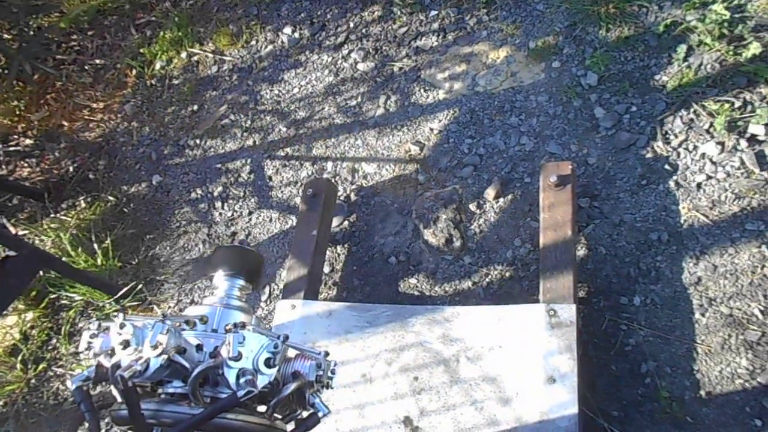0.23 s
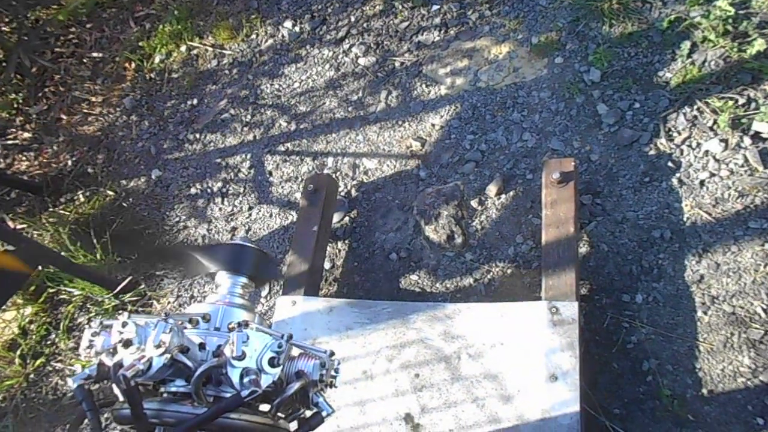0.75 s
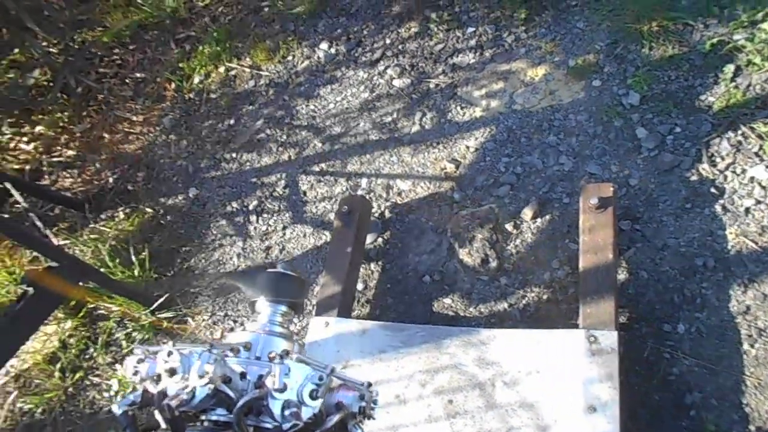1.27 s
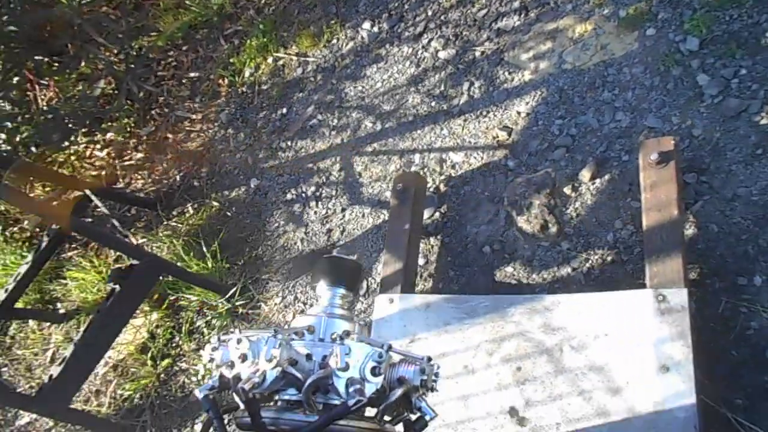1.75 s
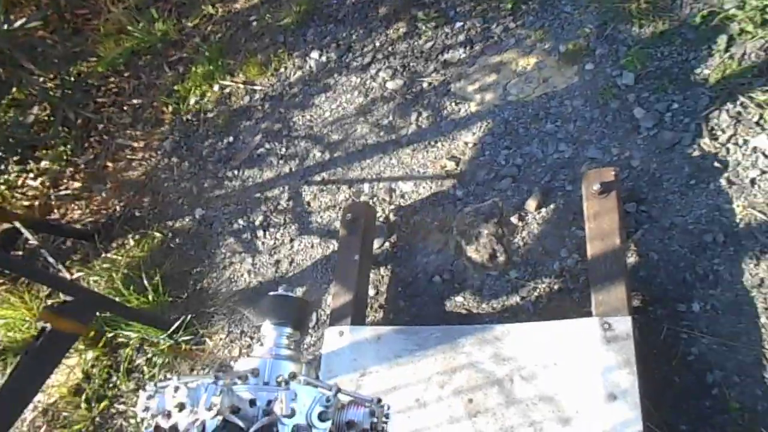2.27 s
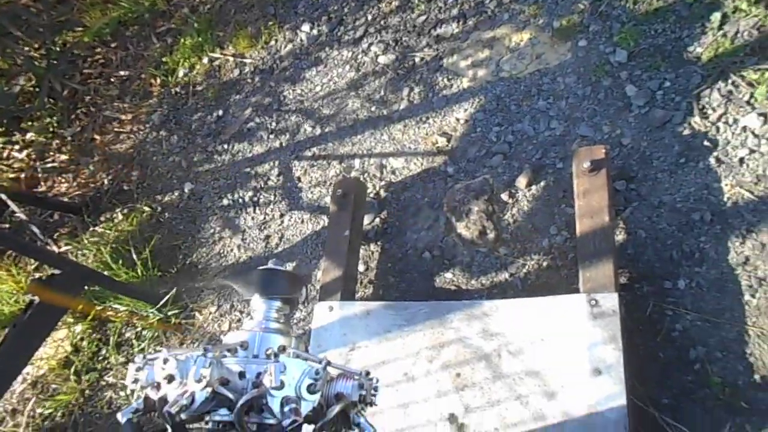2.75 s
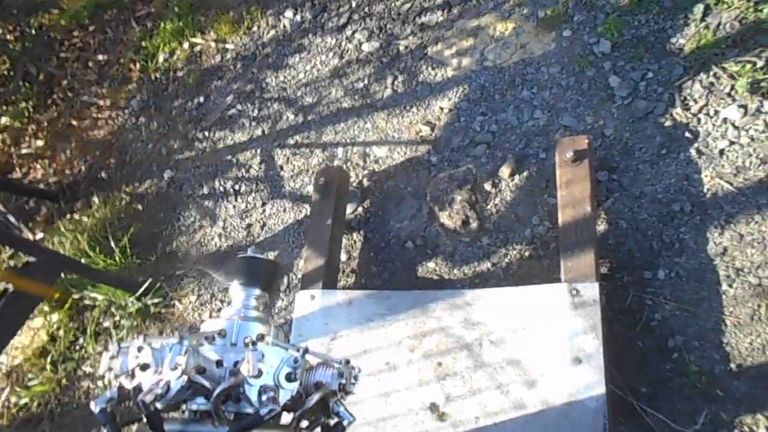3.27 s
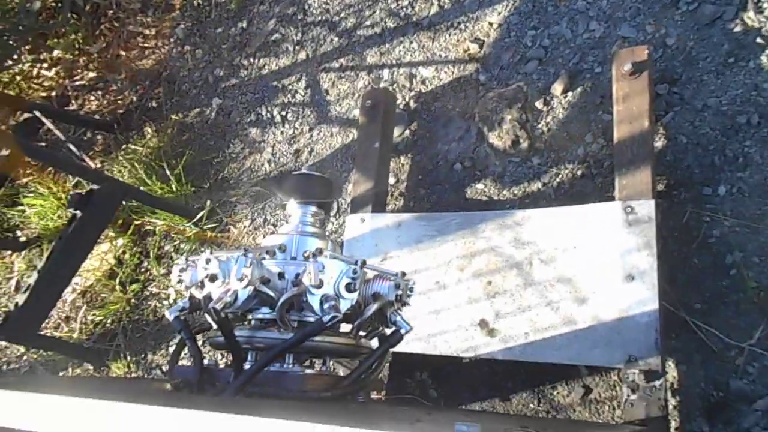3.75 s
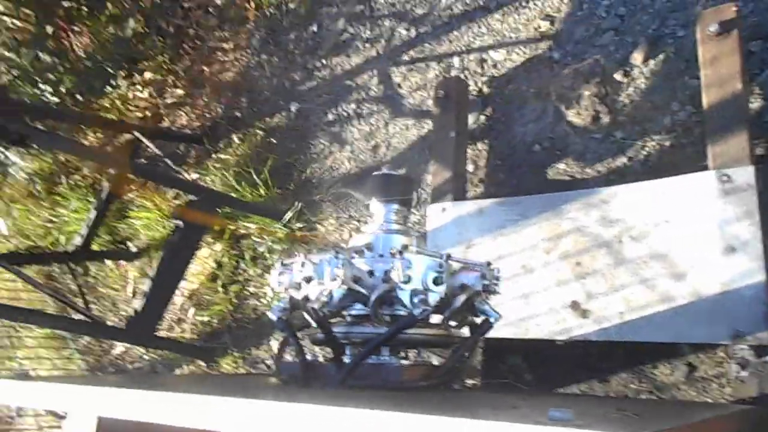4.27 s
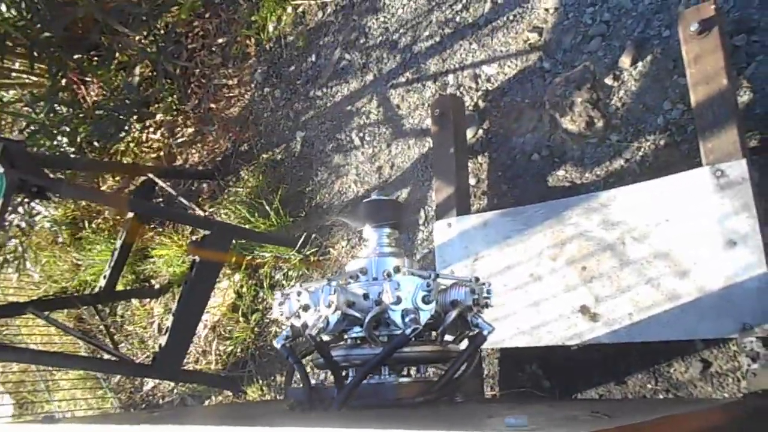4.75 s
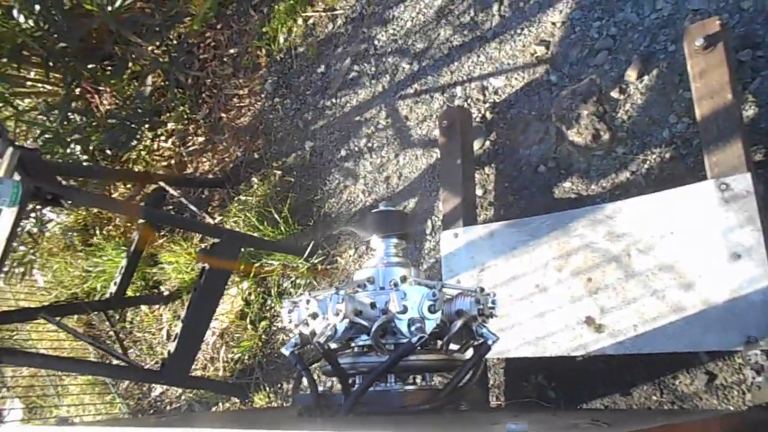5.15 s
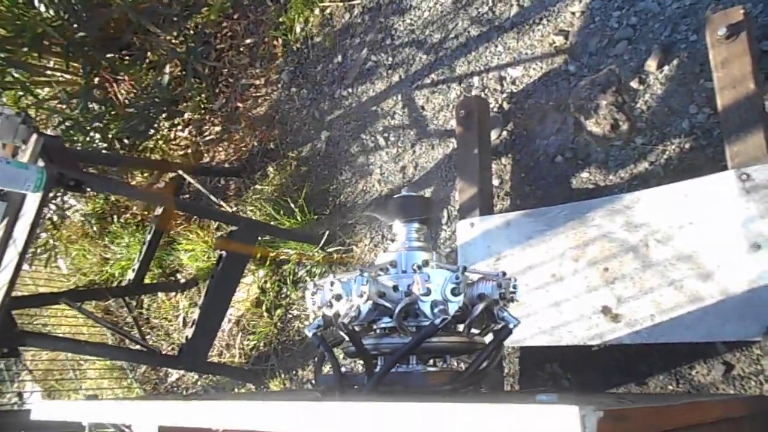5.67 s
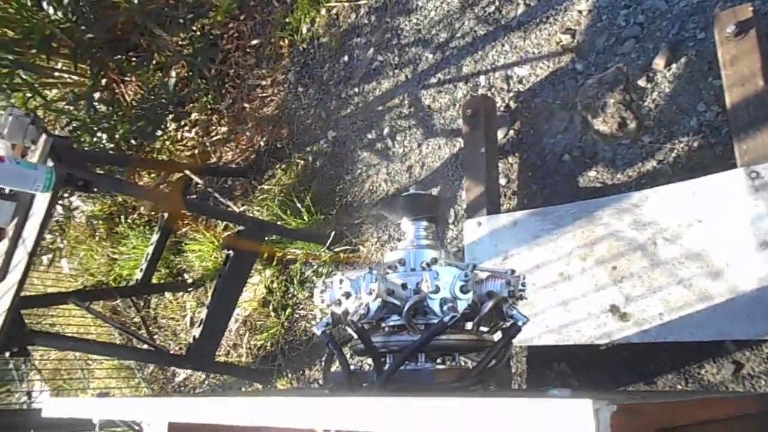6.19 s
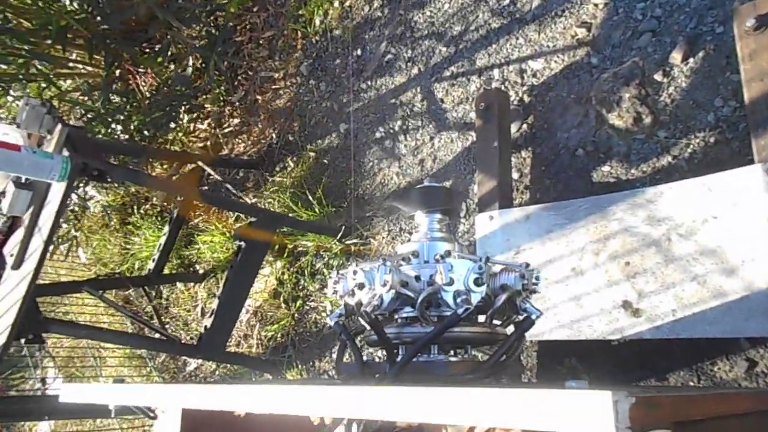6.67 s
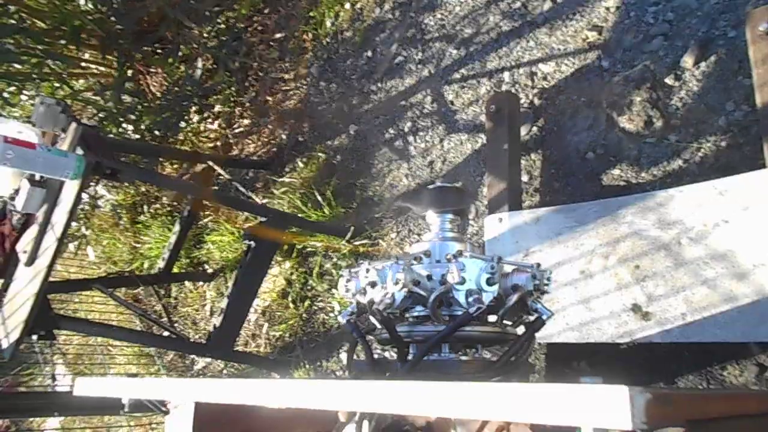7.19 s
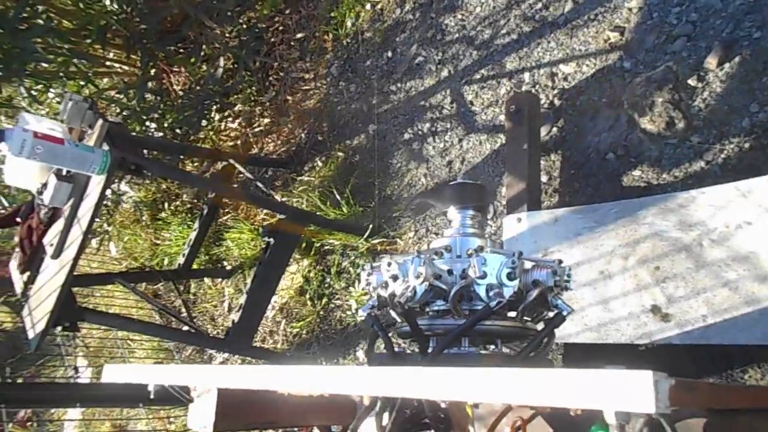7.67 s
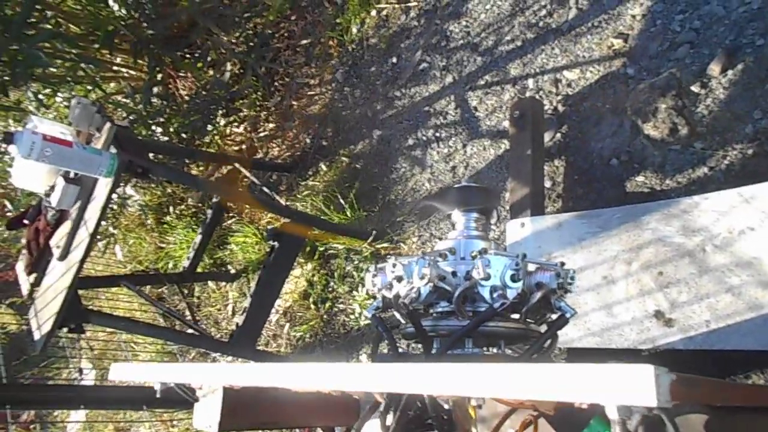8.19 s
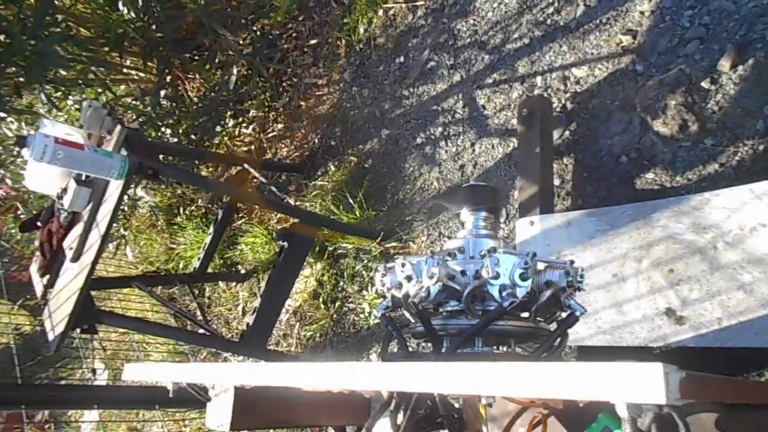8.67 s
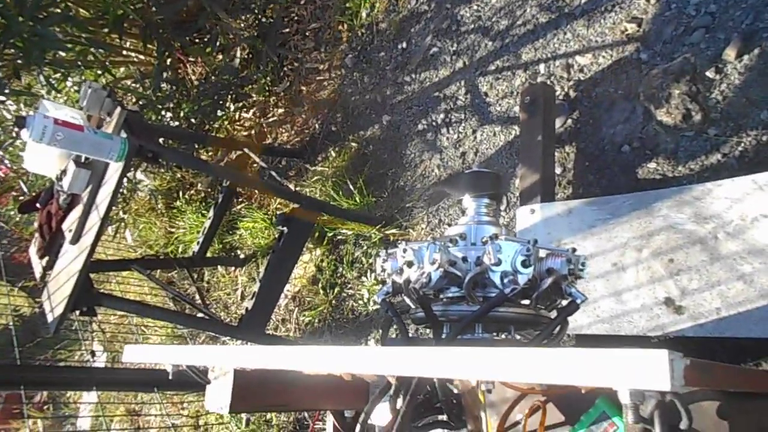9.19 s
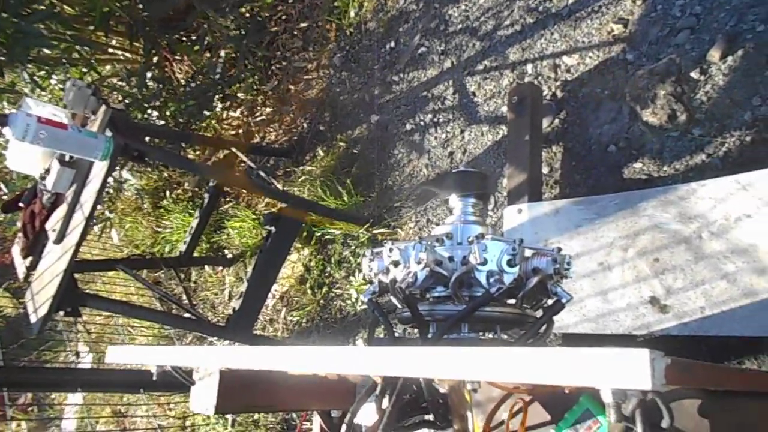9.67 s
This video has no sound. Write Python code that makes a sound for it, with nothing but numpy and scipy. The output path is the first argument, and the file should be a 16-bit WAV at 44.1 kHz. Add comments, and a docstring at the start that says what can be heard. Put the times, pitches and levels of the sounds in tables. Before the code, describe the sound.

A small radial engine with a two-blade propeller stumbles on an outdoor bench: quiet puffs of air, a few loud metallic exhaust snaps, a brief near-lull, then rattling running with frequent cracks. It speeds up steadily after the middle, and propeller wind slams the close microphone, turning everything into dense, crackling, overloaded buffeting with tiny dropouts.

```python
"""A small two-row radial engine stumbles, catches and speeds up on an outdoor bench.
Its fourteen cylinders kick rattling noise and a hum out of the metal; an open exhaust stub snaps with short blasts.
The two-blade propeller blows at the microphone: noise sweeps past its opening (the port) faster as the air speeds up.
Bursts, sharp spikes, flashes of treble and a low rumble come with that wind.
Strong pushes hold the capsule, the part that senses the sound, so that the rest drops out for moments."""
import sys
import numpy as np
from scipy import signal
from scipy.fft import rfft, irfft, next_fast_len
from scipy.io import wavfile
from scipy.ndimage import uniform_filter1d

SR = 44100
rng = np.random.default_rng(int(sys.argv[2]) if len(sys.argv) > 2 else 0)


def pcm_store(signal):
    """Save signal as 16-bit PCM."""
    levels = np.round(np.clip(np.atleast_2d(signal), -1, 1) * 32767)
    wavfile.write(sys.argv[1], SR, levels.astype(np.int16).T)


N = 438354

# --- tables
# speed of the crankshaft: start_s, four_stroke_cycles_per_s
ENGINE_SPEED = [(0, 12.5), (1, 13), (1.6, 10), (2.2, 13.7), (2.6, 14.4), (3.3, 14.5), (3.9, 14.9),
                (4.45, 17), (5, 17.4), (5.5, 18.6), (5.8, 20.5), (6.5, 25.5), (7.5, 30.6), (7.8, 32.7),
                (8, 33.7), (8.5, 34), (8.9, 35.4), (9.94, 36.4)]
# strength of each firing in one cycle, the far row weaker: level_db
CYLINDER_DB = [-1, -18, -2.5, -14.5, 0.5, -2.5, 3.5, -23, -6, -1, -12, -17, -1.5, -2.5]
# tone colour of the rattle: pitch_hz, relative_level_db (per Hz)
CLATTER_COLOUR = [(150, -26), (250, 7), (616, 1.5), (1690, -7.5), (2140, -11), (2420, -18), (2880, -15.5),
                  (6160, -15.5), (8820, -24), (10300, 6.5), (13400, -63), (22000, -120)]
# tones at which case and bench ring: pitch_hz, width_hz, relative_level_db
CASE_TONES = [(1980, 320, -9.5), (2560, 520, -2.5), (3390, 1570, -2), (4600, 270, -12), (5480, 390, -10.5),
              (6640, 330, -22)]
# how the ringing changes over time: start_s, lower_tones_db, upper_tones_db, pitch_factor (all ring tones shift
# together by this factor)
RINGING = [(0, -3.5, 2, 1.03), (0.9, -5.5, -3.5, 1.06), (1.2, 0, -12, 0.84), (1.6, -2.5, -3, 1.03),
           (1.9, -8.5, -5, 0.98), (2.4, -5, -1.5, 1.01), (3.5, -8.5, -4.5, 1.065), (4.5, -4, -6.5, 1.026),
           (5.6, -8, -14.5, 1.066), (9.94, -9, -16, 1.072)]
# exhaust cracks: start_s, level_db, treble_db (tilt of the stub's upper tones), strongest_ring_hz
CRACKS = [(0.4863, -30, -5, 3520), (0.785, -25.5, -1, 4960), (1.076, -12, -14, 3890),
          (1.4143, -18, -28, 2900), (1.481, -35, -28, 2600), (1.6603, -41, -1, 3873),
          (1.793, -26, -8, 2789), (2.1338, -12, -24, 3766), (2.1822, -29, 5, 3480), (2.2451, -31, 0, 4786),
          (2.2621, -15.5, -9, 3650), (2.5301, -34, -3, 2821), (2.67, -22, -9.5, 3640),
          (2.9487, -20, -11, 3630), (3.1008, -33, 5, 3065), (3.342, -23, -15.5, 3833),
          (3.496, -26.5, -13, 2770), (3.634, -22, -15.5, 3695), (3.8361, -20, -11, 3740),
          (4.039, -19, -19, 3795), (4.085, -32, 5, 2679), (4.1519, -21, -8, 4980), (4.1677, -31, 4, 4900),
          (4.289, -12, -13, 3900), (4.346, -31, -24, 2655), (4.5227, -13.5, -17, 4417),
          (4.8169, -22, -12, 3674), (4.8733, -23, -10, 2753), (4.9335, -22.5, -17, 2747),
          (4.9904, -17, -10, 3716), (5.1056, -20, -21.5, 3725), (5.161, -30, -13, 4134),
          (5.215, -21, -27, 4250), (5.2713, -17, -23, 4245), (5.436, -17, -14, 4206),
          (5.4881, -17, -13, 4417), (5.676, -24, -10, 3564), (5.803, -28, -24, 3760)]
# tones of the exhaust stub: pitch_hz, width_hz, relative_level_db
STUB_TONES = [(2700, 760, 4), (4352, 2200, 6.5), (6043, 3500, 8.5), (7661, 2200, 11)]
# course of engine and air: start_s, clatter_db, wash_db
FLOW = [(0, -47.5, -47), (0.36, -46, -40), (0.65, -47.5, -48), (0.9, -40, -47), (1.13, -29, -39),
        (1.33, -45.5, -39), (1.55, -61.5, -52), (1.74, -47.5, -54), (1.82, -35.5, -50), (1.99, -27, -41),
        (2.12, -36, -39), (2.4, -43.5, -45), (2.88, -42, -45), (3.18, -36.5, -41), (4.12, -37.5, -41),
        (4.4, -42.5, -40), (4.95, -39, -40), (5.3, -39.5, -47), (5.65, -32.5, -38), (5.84, -41, -30),
        (6.3, -40.5, -32), (6.6, -42.5, -27), (6.95, -35.5, -23), (7.3, -39, -24), (7.6, -37.5, -28),
        (7.83, -30.5, -21), (8.9, -30, -23.5), (9.14, -28, -20), (9.94, -31.5, -22.5)]
# strongest eddies that burst on the port: middle_s, level_db, width_ms
BURSTS = [(0.079, -34, 8.7), (0.153, -33, 6.7), (0.179, -33, 12.8), (0.21, -36, 22.4), (0.252, -31, 8.1),
          (0.302, -30, 9.8), (0.349, -28, 7.933), (0.383, -32, 12.03), (0.422, -36, 8.9), (0.451, -33, 7.9),
          (0.503, -25, 6.1), (0.54, -33, 6.4), (0.571, -33, 6.2), (0.61, -33, 8.1), (0.625, -35, 7.7),
          (0.759, -33, 10.2), (0.825, -28, 7.26), (1.032, -25, 7.4), (1.04, -22, 10.9), (1.091, -24, 7.6),
          (1.13, -21, 7.9), (1.1368, -16, 2.5), (1.1442, -17, 3.3), (1.177, -22, 11.4), (1.201, -21, 12.8),
          (1.293, -22, 11.1), (1.312, -24.5, 8.4), (1.336, -23, 14.4), (1.415, -30, 15.6), (1.462, -32, 15),
          (1.481, -33, 11.5), (1.51, -34, 16.4), (1.544, -36, 12), (1.861, -30, 16), (2.019, -25, 11.6),
          (2.041, -22, 12.6), (2.054, -23, 6.1), (2.066, -28.5, 7), (2.105, -16, 9.1), (2.116, -18, 3.6),
          (2.277, -22, 11.3), (2.338, -26, 5.8), (2.395, -32.5, 17), (2.59, -33, 5.64), (2.609, -29, 12.1),
          (2.67, -36, 11.5), (2.746, -27, 8.7), (2.818, -33, 11.3), (3.003, -29, 8.4), (3.057, -33, 9.7),
          (3.13, -26, 5.9), (3.159, -28, 7.5), (3.174, -31.5, 6.25), (3.292, -30, 11), (3.333, -26.5, 7.8),
          (3.352, -31, 9.7), (3.47, -26, 5.5), (3.484, -23, 11.4), (3.568, -28.5, 6.9), (3.586, -31, 7.4),
          (3.618, -26, 15.5), (3.645, -32, 13.5), (3.776, -30, 7.4), (3.844, -26, 15), (3.879, -29, 5.74),
          (3.94, -32, 5.9), (3.962, -26, 7.35), (4.046, -29, 12.6), (4.105, -30, 6.6), (4.13, -32, 5.76),
          (4.146, -29, 6.05), (4.187, -29, 18.8), (4.272, -28.5, 9.5), (4.299, -20, 5.46),
          (4.414, -23.5, 7.6), (4.468, -31, 11.8), (4.505, -31, 5.9), (4.523, -28, 21.2), (4.556, -31.5, 6),
          (4.592, -30, 19.8), (4.638, -27, 6.45), (4.685, -28, 15.8), (4.808, -30, 6.6), (4.849, -26, 7.5),
          (4.948, -25, 11), (4.993, -24.5, 7.5), (5.015, -29, 7.5), (5.076, -27.5, 6.04), (5.096, -26, 8.2),
          (5.221, -23, 8.8), (5.236, -28.5, 7.4), (5.497, -26, 18.3), (5.606, -29.5, 11.2),
          (5.647, -24, 10.7), (5.705, -21, 5.8), (5.718, -19.5, 5.6), (5.773, -23, 12.6),
          (5.805, -21, 12.7), (5.882, -21, 6.76), (5.916, -21.5, 6.5), (5.935, -20, 5.57),
          (5.988, -21, 7.8), (6.001, -21, 6.5), (6.016, -20.5, 6.56), (6.04, -17, 15.2),
          (6.068, -18.5, 5.8), (6.157, -21.5, 14.5), (6.228, -19, 7.27), (6.333, -21, 8.05),
          (6.384, -19, 10.8), (6.427, -22, 17.2), (6.514, -18.5, 6.94), (6.599, -21.5, 8.8),
          (6.663, -20.5, 8.9), (6.688, -19, 11.6), (6.785, -17.5, 6.8), (6.799, -16.5, 5.8),
          (6.812, -14, 5), (6.832, -18, 9.3), (6.857, -17, 9.8), (6.889, -16, 13.5), (6.933, -16.5, 5.65),
          (7.021, -18, 7.35), (7.043, -17, 5.63), (7.065, -13, 21.1), (7.09, -17, 10.85),
          (7.111, -16.5, 11), (7.251, -15, 12.4), (7.273, -17.5, 13.5), (7.339, -16.5, 6.4),
          (7.418, -16, 7.74), (7.549, -17, 7.55), (7.572, -19, 7.2), (7.654, -13, 9.25),
          (7.695, -15.5, 8.64), (7.705, -18, 6.76), (7.716, -17, 3.82), (7.731, -18, 6.7),
          (7.739, -18, 2.83), (7.751, -17, 12.5), (7.832, -14.5, 5.5), (7.857, -14.5, 18.5),
          (7.911, -15.5, 17.5), (7.946, -17, 6.86), (7.993, -16, 16), (8.049, -16, 12.4),
          (8.093, -17.5, 20), (8.171, -15, 11.2), (8.191, -14.5, 9.1), (8.213, -15.5, 8.1),
          (8.268, -14.5, 14.3), (8.374, -15, 13.9), (8.434, -16, 21.3), (8.331, -17, 8.45),
          (8.39, -16, 5.62), (8.531, -12.5, 7.37), (8.546, -13, 9.9), (8.594, -16, 5.44),
          (8.645, -15, 10.6), (8.699, -16, 8.3), (8.717, -16.5, 8.3), (8.75, -16, 13.9), (8.865, -17, 7.74),
          (8.576, -14, 17.4), (8.667, -16, 9.75), (8.818, -14.5, 8.1), (8.982, -14, 9.6),
          (9.032, -14.5, 17.3), (9.05, -13.5, 6.2), (9.069, -16.5, 5.6), (9.09, -15.5, 14.1),
          (9.12, -17, 12.2), (9.148, -18, 7.3), (9.187, -14.5, 6.86), (9.21, -16.5, 6), (9.23, -12.5, 12.5),
          (9.245, -16, 8.5), (9.27, -14.5, 10.8), (9.331, -15, 8), (9.361, -15, 15.5), (9.404, -12.5, 10.3),
          (9.455, -14.5, 10.8), (9.524, -14, 9.6), (9.614, -16.5, 6.77), (9.636, -15, 8.65),
          (9.678, -16, 6.94), (9.747, -13, 6.07), (9.766, -13, 6.7), (9.809, -17.5, 9.1)]
# tone colour of the eddies at full air speed: pitch_hz, relative_level_db (per Hz)
EDDY_COLOUR = [(20, -40.5), (60, 1), (150, 9.5), (370, 6.5), (700, -4), (1100, -2), (1700, -5),
               (4700, -16.5), (8000, -72), (12000, -22), (22000, -59)]
# brightest flashes of treble torn off the port's edge: start_s, level_db
FLASHES = [(5.968, -25), (6.033, -10), (6.048, -11), (6.1479, -24), (6.2073, -25), (6.234, -19),
           (6.353, -13), (6.4263, -20), (6.503, -14), (6.5346, -17), (6.714, -27), (6.7549, -25),
           (6.5954, -27), (6.8119, -27), (6.932, -10), (7.0217, -23), (7.0424, 2), (7.2355, -9),
           (7.2554, -15), (7.272, -10), (7.452, -10), (7.6535, -10), (7.694, -4), (7.75, -5), (7.855, -22),
           (7.9085, -4.5), (7.9432, -4), (8.1087, -8), (8.1322, -10), (8.1895, -7), (8.211, -6),
           (8.284, -3), (8.53, -13), (8.5764, -5), (8.6542, -5.5), (8.675, -11), (8.697, -8), (8.8125, -17),
           (8.8649, -1), (9.0852, -22), (9.147, -18), (9.1856, -21), (9.203, -18), (9.2237, -5),
           (9.3082, -13.5), (9.3271, -10), (9.4031, -4), (9.4904, -24), (9.5614, -6), (9.764, -5),
           (9.7869, -11)]
# sharpest pressure spikes on the capsule: middle_s, height (no unit; below zero is suction)
SPIKES = [(0.3477, -0.31), (0.38, 0.081), (0.3873, 0.083), (0.5009, -0.39), (1.041, -0.22),
          (1.0795, -0.066), (1.138, 0.53), (1.145, -0.94), (1.178, 0.49), (1.2005, -0.16), (1.2958, -0.02),
          (1.3354, 0.072), (1.415, 0.053), (1.9473, -0.093), (2.0401, -0.28), (2.116, -0.59),
          (2.2686, -0.2), (2.7475, 0.11), (2.7616, -0.23), (3.003, -0.14), (3.129, 0.23), (3.1572, -0.2),
          (3.333, 0.14), (3.4774, -0.14), (3.4831, 0.25), (3.6177, -0.27), (3.6237, -0.065), (3.7756, 0.05),
          (3.9617, -0.19), (4.046, 0.022), (4.1456, 0.071), (4.186, -0.11), (4.2719, 0.097),
          (4.2991, -0.39), (4.5238, 0.08), (4.6922, -0.22), (4.849, -0.2), (4.9332, 0.13), (4.9481, -0.2),
          (4.9915, 0.083), (5.0041, -0.12), (5.0752, 0.2), (5.0967, -0.18), (5.2196, -0.19),
          (5.2337, -0.046), (5.4895, -0.15), (5.4977, 0.11), (5.6627, 0.2), (5.7054, 0.1), (5.7325, -0.4),
          (5.7728, 0.1), (5.9757, -0.29), (5.9887, -0.23), (6.0001, -0.2), (6.034, -0.66), (6.0401, -0.41),
          (6.048, -0.5), (6.0558, -0.3), (6.1575, -0.06), (6.208, -0.2), (6.2271, 0.24), (6.2359, 0.081),
          (6.3328, -0.078), (6.3461, -0.28), (6.3581, -0.29), (6.3846, -0.15), (6.4371, -0.22),
          (6.5052, -0.22), (6.5138, -0.18), (6.5357, -0.2), (6.5597, 0.24), (6.609, -0.33), (6.6642, -0.17),
          (6.7848, -0.37), (6.7982, -0.65), (6.811, -1.01), (6.8591, 0.0029), (6.8898, -0.36),
          (6.933, -0.53), (6.966, -0.31), (7.026, -0.51), (7.0424, -0.72), (7.0653, -0.82), (7.0954, 0.37),
          (7.1118, -0.64), (7.1278, -0.23), (7.237, 0.51), (7.2507, 0.47), (7.2575, -0.55), (7.2747, -0.67),
          (7.338, -0.43), (7.3498, -0.41), (7.4044, -0.26), (7.418, -0.64), (7.536, -0.36), (7.5484, -0.32),
          (7.5725, -0.35), (7.651, -0.51), (7.6546, 0.7), (7.6946, -0.46), (7.7102, 0.58), (7.717, 0.9),
          (7.7494, -0.72), (7.7864, 0.44), (7.8314, 0.5), (7.8565, -0.49), (7.864, -0.59), (7.916, -1.06),
          (7.922, -0.74), (7.927, -0.52), (7.944, -0.21), (7.992, 0.34), (7.998, 0.39), (8.042, 0.42),
          (8.0495, -0.46), (8.0788, 0.34), (8.0929, -0.56), (8.1713, 0.74), (8.1906, 0.74), (8.213, 0.99),
          (8.243, -0.62), (8.2554, -0.57), (8.268, -0.42), (8.2746, -0.51), (8.2845, -0.25), (8.3431, 0.51),
          (8.3675, -0.45), (8.3742, 0.56), (8.434, -0.55), (8.5297, -0.78), (8.546, 0.82), (8.5696, 0.56),
          (8.577, 1), (8.5843, -0.66), (8.6456, -0.69), (8.6563, -0.75), (8.6663, -0.43), (8.6815, 0.54),
          (8.7167, -0.46), (8.728, -0.57), (8.7467, 0.54), (8.755, 0.081), (8.8182, -0.35), (8.8277, -0.34),
          (8.8655, -0.34), (8.9017, -0.42), (8.9825, -0.61), (9.032, -0.79), (9.048, -0.59), (9.087, -0.31),
          (9.0708, 0.51), (9.0974, 0.49), (9.1032, 0.63), (9.1143, 0.29), (9.187, 0.7), (9.2249, 0.64),
          (9.2295, 0.81), (9.248, 0.8), (9.2698, -0.75), (9.3096, -0.73), (9.3316, 0.33), (9.3511, 0.65),
          (9.3601, -0.47), (9.4041, -0.96), (9.4368, -0.42), (9.4482, -0.61), (9.4548, 0.68),
          (9.462, -0.52), (9.5073, 0.8), (9.523, -0.6), (9.5399, -0.69), (9.5889, 0.44), (9.614, 0.64),
          (9.6353, -0.63), (9.677, -0.39), (9.6935, -0.42), (9.7219, -0.61), (9.7405, 0.46), (9.748, -0.5),
          (9.7675, 0.55), (9.7742, -0.5), (9.809, 0.4), (9.8308, -0.38), (9.8611, -0.55), (9.8798, -0.15)]
# surges that pin the capsule: start_s, length_ms
SURGES = [(1.133, 3.3), (1.1383, 5.5), (1.1456, 6), (1.193, 4), (2.0464, 2.56), (2.0577, 3.6),
          (2.1113, 2.535), (6.7482, 2.2), (6.8977, 2.6), (6.9796, 3.5), (7.0156, 2.16), (7.16, 2.28),
          (7.3285, 2.35), (7.4323, 2.78), (7.6435, 2.77), (7.71, 2.42), (7.834, 2.16), (7.8514, 2.6),
          (7.872, 2.72), (8.207, 3.18), (8.2578, 3.47), (8.393, 2.95), (8.5975, 4.7), (8.6045, 1.78),
          (8.7294, 3.32), (8.7646, 2.6), (8.871, 2.43), (8.9272, 2.83), (8.9898, 3), (9.2613, 2.55),
          (9.3637, 2.2), (9.3885, 2.7), (9.415, 2.03), (9.4985, 2.34), (9.5957, 2.49), (9.8717, 2.27),
          (9.9132, 3.1), (9.919, 2.23)]

# --- settings of the engine
HUM_DB = -15   # against the clatter, before the weights of its two tones
CRACK_RING_WIDTH_HZ, CRACK_RING_DB = 520, 11   # the strongest ring of each crack
BLADES_PER_CYCLE, BLADE_DB = 4, 2.5   # blade passes per engine cycle; swing up and down with each

# --- settings of the wind
FULL_WASH_DB, SPEED_POWER = -18.5, .35   # level of full air speed; speed grows as level to this power
LESSER_PER_CYCLE, LESSER_MS = 1.9, 4.5   # lesser bursts: number per engine cycle, usual width
LESSER_DB, LESSER_SPREAD_DB = 3, 2   # their level over the wash and its random spread
FIZZ_DB, FIZZ_LUMPS_DB, FLASH_MS = -27.5, 7.5, 0.5   # base level, depth of lumps, decay of listed flashes
RUMBLE_DB, RUMBLE_KNEE_DB, RUMBLE_TOP_HZ = -2.5, -30, 97   # base level; wind level of its ceiling; top edge

# --- settings of spikes and capsule
SMALL_SPIKES_PER_S, SMALL_SPIKE_DB = 480, 5   # rate at full air speed; usual height over the air, before a soft limit
REBOUND, REBOUND_MS = .5, .6   # swing the other way: share of height and delay, before random factors
EDGE_DB, EDGE_MS = -14.5, 0.34   # torn treble of each spike: base level, decay
SLOW_AIR_DB, SLOW_STRETCH = -29, 1.47   # below this wash level spikes are this many times longer
PIN_HEIGHT, PIN_MS = .4, 1.93   # a push above this height pins the capsule this long
SURGE_HEIGHT = 0.21   # pulse just ahead of each surge
BEND_DB = -15.5   # slow pressure at which the capsule passes half
CUTOFF_HZ = 11000


def from_db(db):
    """Turn decibels into a plain factor."""
    return 10 ** (np.asarray(db) / 20)


def rms_one(x):
    """Scale to an average strength (rms) of 1."""
    return x / np.sqrt(np.mean(x ** 2) + 1e-20)


def in_time(rows):
    """Join the points of a table by straight lines, one curve per column."""
    s, *columns = np.transpose(rows)
    return [np.interp(np.arange(N) / SR, s, c) for c in columns]


def coloured(x, spectrum):
    """Shape the tone colour by a table of pitches and levels; rms 1."""
    size = next_fast_len(len(x))
    hz = np.arange(size // 2 + 1) * SR / size + 1
    table_hz, table_db = np.transpose(spectrum)
    db = np.interp(np.log(hz), np.log(table_hz), table_db)
    return rms_one(irfft(rfft(x, size) * from_db(db), size)[:len(x)])


def lowpass(x, hz):
    """Keep what lies below a pitch."""
    return signal.sosfilt(signal.butter(2, hz, fs=SR, output="sos"), x)


def noise_band(low_hz, high_hz):
    """White noise between two pitches."""
    band = signal.butter(2, [low_hz, high_hz], "band", fs=SR, output="sos")
    return signal.sosfilt(band, rng.standard_normal(N))


def drift(rate_hz):
    """Slow random wandering: noise smoothed twice, already settled at the start; rms 1."""
    r = np.exp(-2 * np.pi * rate_hz / SR)
    return rms_one(signal.lfilter([1], [1, -2 * r, r * r], rng.standard_normal(N + SR))[SR:])


def resonance(hz, width_hz):
    """Filter numbers of one ringing tone; its own pitch passes at full strength."""
    r = np.exp(-np.pi * width_hz / SR)
    return [(1 - r * r) / 2, 0, (r * r - 1) / 2], [1, -2 * r * np.cos(2 * np.pi * hz / SR), r * r]


def resonate(x, hz, width_hz):
    """Make a sound ring at one fixed pitch."""
    return signal.lfilter(*resonance(hz, width_hz), x)


def gliding(x, hz, width_hz):
    """Make a sound ring at a pitch that follows a curve, stepped block by block."""
    out, state = np.empty(N), np.zeros(2)
    for i in range(0, N, 2048):
        b, a = resonance(hz[i], width_hz)
        out[i:i + 2048], state = signal.lfilter(b, a, x[i:i + 2048], zi=state)
    return out


def dying(clicks, ms):
    """Let each click fade away exponentially."""
    return signal.lfilter([1], [1, -np.exp(-1000 / (ms * SR))], clicks + 1e-18)


def clatter(cycle):
    """Every firing kicks a puff of noise out of a steady rattle; each band of the case shakes on its own."""
    firing = (cycle * len(CYLINDER_DB)).astype(int)
    fires = np.diff(firing, prepend=0) > 0
    cylinder_db = np.array(CYLINDER_DB)[firing % len(CYLINDER_DB)]
    rattle, edges_hz = 0, [150, 1500, 2400, 3300, 4400, 5200, 6400, 8000, 12000]
    for low, high in zip(edges_hz, edges_hz[1:]):
        strength = from_db(cylinder_db + 3.5 * rng.standard_normal(N))
        puffs = (.45 + dying(fires * strength, ms=2.2)) * from_db(2.5 * drift(15))
        band = signal.butter(2, [low, high], "band", fs=SR, output="sos")
        rattle = rattle + signal.sosfilt(band, puffs * rng.standard_normal(N))
    lower_db, upper_db, pitch = in_time(RINGING)
    rings = 0
    for hz, width, db in CASE_TONES:
        course_db = lower_db if hz < 4000 else upper_db
        tone = rms_one(gliding(rattle, hz * pitch, width))
        rings = rings + from_db(db + 1.03 * drift(1.64) + course_db) * tone
    return coloured(rattle, CLATTER_COLOUR) + rings


def hum(cycle):
    """The firing rate sounds as a wavering tone with its octave."""
    phase = 2 * np.pi * len(CYLINDER_DB) * cycle + 0.65 * drift(5)
    return from_db(HUM_DB + 1.5 * drift(4.7)) * (1.05 * np.sin(phase) + 1.4 * np.sin(2 * phase))


def cracks():
    """A late charge leaves the stub as a snap and a short noise blast with a weaker tail; each rings its own way."""
    out = np.zeros(N + SR)
    click = np.eye(1, 1500)[0]
    noise = rng.standard_normal((len(CRACKS), len(click)))
    for (s, level_db, treble_db, ring_hz), hiss in zip(CRACKS, noise):
        fade = 0.64 * dying(click, ms=0.83) + 0.07 * dying(click, ms=2.0)
        blast = 6.1 * click + fade * hiss
        sound = from_db(CRACK_RING_DB) * resonate(blast, ring_hz, CRACK_RING_WIDTH_HZ)
        for k, (hz, width, db) in enumerate(STUB_TONES):
            tilt_db = treble_db * np.clip(np.log2(hz / 4200), 0, 1)   # in full from an octave up
            sound = sound + (-1) ** k * from_db(db + tilt_db) * resonate(blast, hz, width)
        out[round(s * SR):][:len(click)] += from_db(level_db) * sound
    return out[:N]


def gusts(wash_db, cycle):
    """Level of the air on the port: lumpy wash, strong bursts and lesser bursts at random add their power."""
    power = from_db(2 * (wash_db + 2.5 * drift(25.06)))
    draws = rng.standard_normal((800, 3))
    start_cycles = np.cumsum(np.abs(draws[:, 0]) + .2) / LESSER_PER_CYCLE
    starts = np.searchsorted(cycle, start_cycles)
    lesser = [(i / SR, wash_db[i] + LESSER_DB + LESSER_SPREAD_DB * a, LESSER_MS * np.exp(.4 * b))
              for i, (a, b) in zip(starts, draws[:, 1:]) if i < N]
    near = np.arange(-2000, 2000)
    for s, level_db, ms in list(BURSTS) + lesser:
        at = np.clip(round(s * SR) + near, 0, N - 1)
        bump = np.exp(-np.abs(1.8 * near * 1000 / (SR * max(ms, 2))) ** 3)
        power[at] += from_db(2 * level_db) * bump
    return np.sqrt(power) * from_db(2.3 * drift(200))


def wash(level):
    """A frozen train of eddies is swept past the port: faster air plays it higher."""
    speed = np.clip((level / from_db(FULL_WASH_DB)) ** SPEED_POWER, .05, 1.6)
    # eddies the size of the port swing smoothly
    swings = lowpass(coloured(rng.standard_normal(2 * N), EDDY_COLOUR), 1400)
    # a few have steep fronts
    sharp = from_db(4.2 * np.minimum(rng.exponential(1, 2 * N), 4))
    fronts = coloured(sharp * rng.standard_normal(2 * N), EDDY_COLOUR)
    train = rms_one(0.46 * swings + fronts)
    return 0.96 * level * np.interp(np.cumsum(speed), np.arange(2 * N), train)


def fizz(air):
    """Fast air tears at the port's edge in brief flashes of treble."""
    treble = rms_one(noise_band(1800, 7500))
    lumps = rms_one(from_db(FIZZ_LUMPS_DB * np.minimum(drift(320), 1.6)))
    lesser = from_db(FIZZ_DB) * air * np.sqrt(air / from_db(FULL_WASH_DB)) * lumps
    s, level_db = np.transpose(FLASHES)
    bright = np.zeros(N)
    bright[np.round(s * SR).astype(int)] = from_db(level_db)
    return treble * (lesser + 0.77 * dying(bright, ms=FLASH_MS))


def spike_clicks(air, passed):
    """The listed pressure spikes among lesser random ones, mostly suction, that crowd in as the air speeds up."""
    chance = SMALL_SPIKES_PER_S / SR * (air / from_db(FULL_WASH_DB)) ** SPEED_POWER
    height = air * passed * from_db(SMALL_SPIKE_DB + 1.75 * rng.standard_normal(N))
    clicks = (rng.random(N) < chance) * height
    clicks = .4 * np.tanh(clicks / .4)   # soft limit on height
    clicks *= np.where(rng.random(N) < .6, -1, 1)
    s, listed_height = np.transpose(SPIKES)
    clicks[np.round(s * SR).astype(int)] = listed_height
    return clicks


def add_rebounds(clicks):
    """Pressure swings the other way before and after each spike; tall pushes have no swing after."""
    at = np.flatnonzero(clicks[200:-200]) + 200
    for side in (-1, 1):
        lag = side * REBOUND_MS / 1000 * SR * rng.uniform(0.3, 1.7, len(at))
        free = side < 0 or clicks[at] < PIN_HEIGHT
        clicks[at + lag.astype(int)] -= free * REBOUND * rng.uniform(0.063, 1.34, len(at)) * clicks[at]


def spikes(air, passed):
    """Pointed pulses rise fast and sag slower, each with torn treble; a small pulse comes ahead of each surge."""
    clicks = spike_clicks(air, passed)
    treble = rms_one(noise_band(1500, 7000))
    edges = from_db(EDGE_DB) * treble * dying(np.abs(clicks) ** 1.32, ms=EDGE_MS) * passed
    add_rebounds(clicks)
    near = np.arange(-90, 91) / SR   # seconds around the point
    quick, broad = (1.3 * np.exp(-np.abs(near) / np.where(near < 0, .00014, .00022) / k)
                    - .03 * k * np.exp(-(near / .0013) ** 2) for k in (1, SLOW_STRETCH))
    slow = in_time(FLOW)[1] < SLOW_AIR_DB
    pulses = np.convolve(clicks * ~slow, quick, "same") + np.convolve(clicks * slow, broad, "same")
    surge_clicks = np.zeros(N)
    surge_clicks[np.round((np.transpose(SURGES)[0] - .0008) * SR).astype(int)] = SURGE_HEIGHT
    sink = np.exp(-np.abs(near) / np.where(near < 0, .0002, .0004))
    return pulses + np.convolve(surge_clicks, sink, "same") + edges


def capsule_gain(air):
    """Slow pressure bends the capsule so it passes less; a surge or hard push holds it and almost nothing passes."""
    push = uniform_filter1d(air, size=2500) * drift(138) / from_db(BEND_DB)
    gain = 1 / (1 + push ** 2)
    hard_pushes = [(s, PIN_MS) for s, height in SPIKES if height > PIN_HEIGHT]
    for s, ms in list(SURGES) + hard_pushes:
        gain[round(s * SR):round((s + ms / 1000) * SR)] = 0.022
    for s, _ in SPIKES:   # a sharp spike crowds out the rest while it lasts
        gain[round((s - .0006) * SR):round((s + .0006) * SR)] *= .35
    return uniform_filter1d(gain, size=15)


def rumble(air):
    """The largest eddies thump unevenly with the gusts, up to a ceiling."""
    low = rms_one(noise_band(22, RUMBLE_TOP_HZ))
    swell = uniform_filter1d(air, size=900)
    limited = swell / (1 + (swell / from_db(RUMBLE_KNEE_DB)) ** 2) ** 0.62
    return from_db(RUMBLE_DB + 2.8 * drift(7.6)) * limited * low


def scene():
    """Clatter and wash throb with the blades; engine and wind pass through the capsule together."""
    clatter_db, wash_db = in_time(FLOW)
    cycle = np.cumsum(in_time(ENGINE_SPEED)[0]) / SR   # engine cycles so far
    throb = from_db(BLADE_DB * np.cos(2 * np.pi * BLADES_PER_CYCLE * cycle + 0.95 * drift(6.4)))
    engine = from_db(clatter_db) * (throb * clatter(cycle) + hum(cycle)) + cracks()
    air = gusts(wash_db, cycle)
    wind = wash(air * np.sqrt(throb)) + fizz(air * throb)
    passed = capsule_gain(air)
    return ((engine + wind) * passed + spikes(air, passed) + rumble(air))[None]


def record(dry):
    """Deep bass is cut, peaks are rounded, the treble rolls off and then ends steeply."""
    x = signal.sosfilt(signal.butter(2, 24, "high", fs=SR, output="sos"), dry)
    x = 0.73 * np.tanh(x / 0.98)
    x = signal.sosfilt(signal.butter(4, 9600, fs=SR, output="sos"), x)
    return signal.sosfilt(signal.cheby2(11, 65, CUTOFF_HZ, fs=SR, output="sos"), x)


dry = scene()
out = record(dry)
pcm_store(out)
```